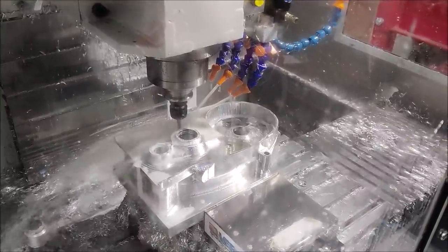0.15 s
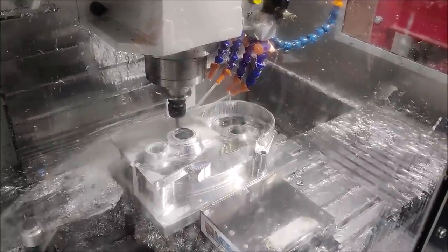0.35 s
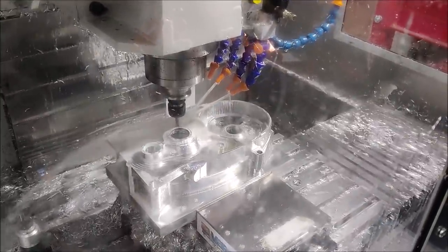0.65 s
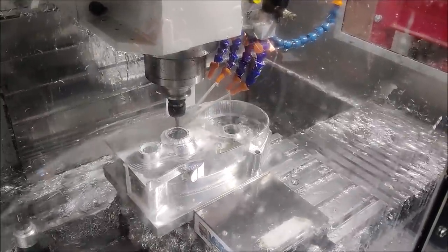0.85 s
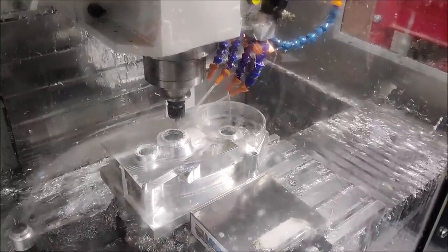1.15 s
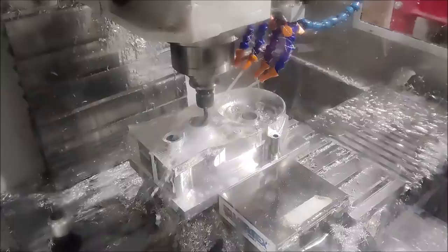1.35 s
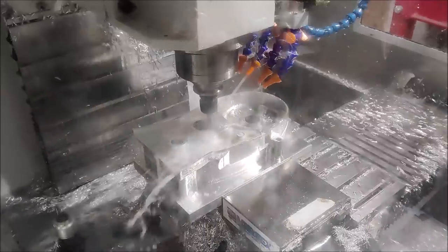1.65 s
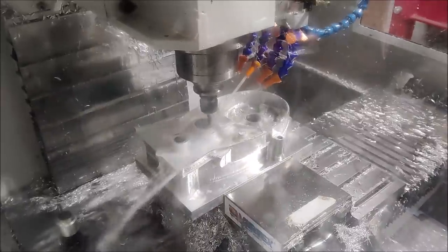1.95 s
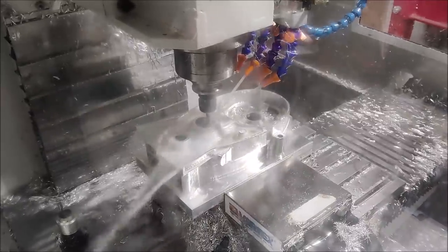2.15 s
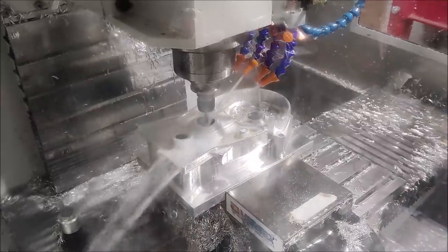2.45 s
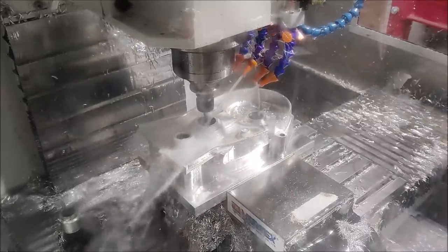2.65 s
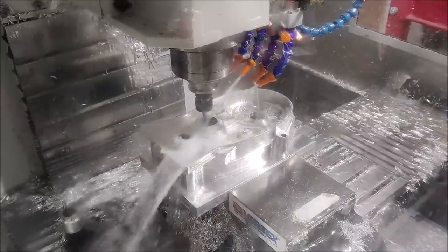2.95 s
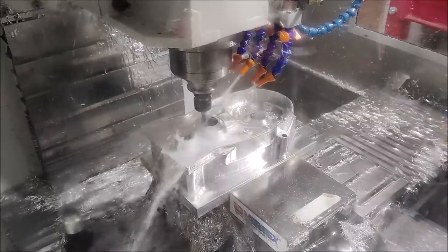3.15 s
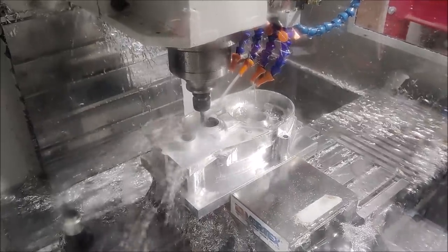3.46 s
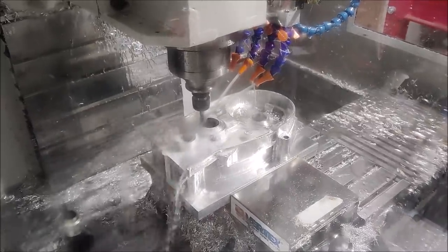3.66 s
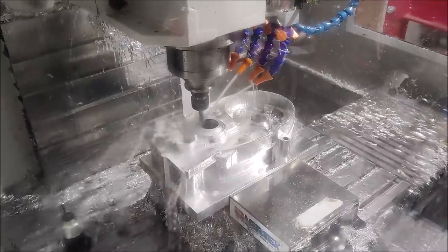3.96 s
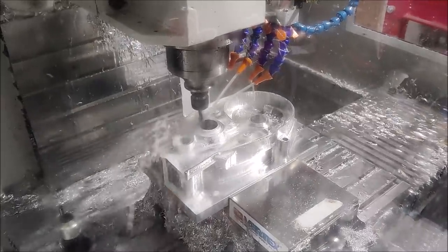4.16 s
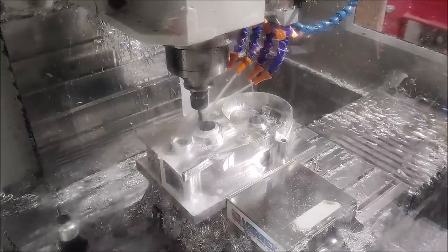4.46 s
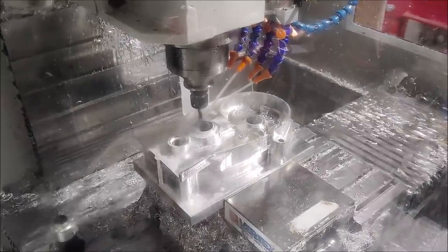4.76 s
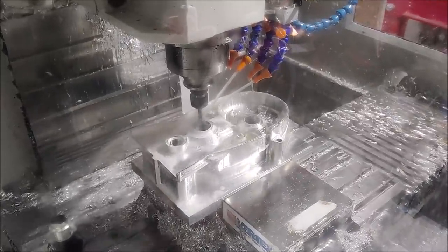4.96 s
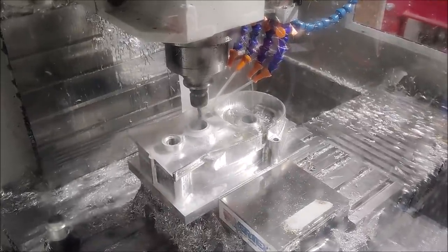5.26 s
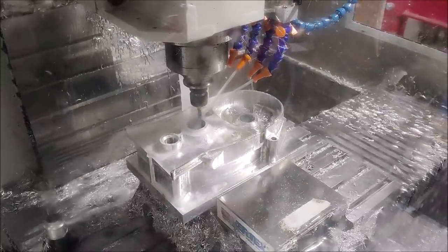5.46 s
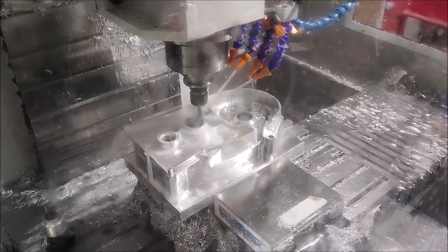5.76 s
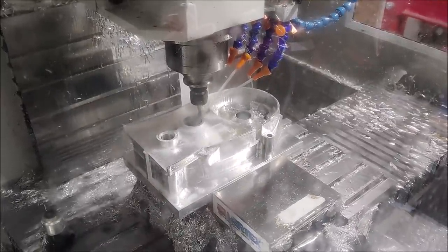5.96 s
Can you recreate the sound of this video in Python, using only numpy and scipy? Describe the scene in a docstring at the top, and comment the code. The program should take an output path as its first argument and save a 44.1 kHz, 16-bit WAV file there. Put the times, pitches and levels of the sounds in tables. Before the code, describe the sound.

A milling cutter whines piercingly and rasps through metal under hissing coolant over a low motor hum, dropping briefly to silence before swelling back.

```python
"""Inside the steel enclosure of a CNC mill, an aluminium part is finished at 6000 rpm under flood coolant.
Filtered noise makes the coolant, wavering sines the motors, frame hum and tool whine near 5 kHz. The cutter
scrapes steadily, swelling slightly each turn in a pattern that repeats every eight turns, and ticks in a two-
turn pattern; short ringing strokes near 5 kHz make the chatter, on a lap of their own. After a second the sound
drops out, then swells back in on a later pass of the cut."""
import sys
import numpy as np
from scipy import signal
from scipy.fft import rfft, irfft
from scipy.io import wavfile
from scipy.ndimage import uniform_filter1d

SR = 44100
rng = np.random.default_rng(int(sys.argv[2]) if len(sys.argv) > 2 else 0)


def wav_record(signal):
    """Record a signal, one row per channel, as 16-bit PCM in the file named by sys.argv[1]."""
    frames = np.transpose(np.atleast_2d(signal))
    bounded = np.clip(frames, -1, 1)
    # unit amplitude maps onto the largest positive 16-bit level
    quanta = np.round(bounded * 32767).astype(np.int16)
    wavfile.write(sys.argv[1], SR, quanta)


N = 269451
TIME = np.arange(N) / SR  # s
FREQ = np.arange(N // 2 + 1) * SR / N  # Hz
SPINDLE_HZ = 100
SECOND_PASS_S = 1.2  # settings change here, inside the silence
PORT_LAG_S = .00047  # longest delay of the right port behind the left
TURNS_PER_CYCLE = 8  # the scrape repeats after this many turns


def undb(db):
    """Decibels to gain."""
    return 10 ** (np.asarray(db) / 20)


def curve(rows):
    """Rows of (time_s, value) joined by straight lines."""
    return np.interp(TIME, *np.transpose(rows))


def spectrum(rows):
    """Rows of (pitch_hz, value) joined on a log-frequency axis."""
    hz, value = np.transpose(rows)
    return np.interp(np.log(FREQ + 1), np.log(hz), value)


def pan(left_minus_right_db):
    """Left and right gains for a level difference, keeping the mean power."""
    gains = undb(np.array([left_minus_right_db, -left_minus_right_db]).reshape(2, -1) / 2)
    return gains / np.sqrt(np.mean(gains ** 2, axis=0))


def walk(rate_hz):
    """Smooth random drift with a spread near 1 that changes about rate_hz times a second."""
    count = int(rate_hz * N / SR) + 3
    coarse = signal.resample(rng.standard_normal(count), count * 8)
    return np.interp(TIME * rate_hz * 8, np.arange(len(coarse)), coarse)


def port_lag(hz):
    """Treble comes straight from the cut and reaches the left port first; bass fills the enclosure evenly."""
    return PORT_LAG_S * np.interp(hz, [600, 1100], [.15, 1])


def tone(phase, first_db, second_db, pan_db, lead_rad):
    """One stereo partial, with its own level on each pass and its own standing wave between the ports."""
    gain = np.where(TIME < SECOND_PASS_S, undb(first_db), undb(second_db))
    port_delay = np.array([[0], [lead_rad]])
    return np.sqrt(2) * gain * pan(pan_db) * np.sin(phase - port_delay)


# colour of the first pass, which cuts elsewhere on the part: pitch_hz [Hz], gain_db [dB]
FIRST_PASS_COLOUR = [(200, -0.5), (600, 1.5), (1500, -1.5), (2000, -2), (2800, 0), (3600, -0.5), (5000, 2),
                     (7000, -0.5), (10000, -2.5)]


def first_pass(x):
    """The cut sits elsewhere on the part before the drop-out, so an equaliser gives it another colour."""
    coloured = irfft(rfft(x) * undb(spectrum(FIRST_PASS_COLOUR)), N)
    return np.where(TIME < SECOND_PASS_S, coloured, x)


# coolant jets and run-off, with a thin sizzle near 10 kHz, before trim: pitch_hz [Hz], density_db [dB per Hz]
COOLANT_COLOUR = [(20, -66), (60, -62), (450, -65), (700, -64.5), (900, -68), (1130, -63), (1400, -69.5),
                  (2600, -63.5), (3200, -64), (4200, -61.5), (4800, -66.5), (5400, -65), (7500, -66.5),
                  (8600, -78.5), (9600, -80.5), (10050, -65), (10600, -100), (11500, -104), (13000, -91)]
# likeness of the coolant noise at the two ports: pitch_hz [Hz], likeness [0-1]
PORT_LIKENESS = [(40, .95), (300, 0.94), (700, 0.1), (1500, 0.3), (5000, 0), (12000, 0.12)]
# stereo balance across pitch, shared with the ticks and scrape: pitch_hz [Hz], left_minus_right_db [dB]
BALANCE = [(100, -3.5), (400, 1), (2500, -1), (4000, -1), (5000, 10.5), (6500, -7), (7400, 6), (8200, 8),
           (10000, 11), (14000, 7)]


def coolant(turns, trim_db=-4.0, splash_db=0.7, spray_db=1.0, drops_db=-9):
    """Jets hiss on the part, drops patter on the guards, and the cutter flings spray once a turn."""
    drop_chance = 900 / SR  # 900 drops a second in each noise
    drops = (rng.random((2, N)) < drop_chance) * rng.standard_normal((2, N))
    noise = rng.standard_normal((2, N)) + undb(drops_db) * drops / drops.std()
    swell_db = splash_db * walk(22.04) + spray_db * np.cos(2 * np.pi * turns)
    shared, own = rfft(noise * undb(swell_db))
    # the right port hears a late copy of the left, mixed with noise of its own
    likeness = np.clip(spectrum(PORT_LIKENESS), 0, 1)
    late = shared * np.exp(-2j * np.pi * FREQ * port_lag(FREQ))
    right = likeness * late + np.sqrt(1 - likeness ** 2) * own
    colour = undb(spectrum(COOLANT_COLOUR) + trim_db) * pan(spectrum(BALANCE)) * np.sqrt(SR / 2)
    return irfft(colour * np.array([shared, right]), N)


# pump and drive motor tones, levels before trim: pitch_hz [Hz], first_pass_db [dB], second_pass_db [dB],
# left_minus_right_db [dB], left_lead_rad [radians], roughness_rad [radians]
MOTOR_TONES = [(379.5, -42.5, -47, 1, -.1, .8), (450, -52, -49, 0, -.1, .6), (522.5, -53, -54, 3, .3, .2),
               (638.5, -51, -52, 7, .4, .2), (734.2, -53, -52, 6, -.6, .3), (736.3, -46, -45, 6, -.6, .35),
               (746.27, -41.5, -40.5, 1, -.4, .06), (750, -51, -46.5, 3, -.5, .06),
               (763.2, -56, -52, 7, 1, .4), (820.9, -54, -52, 7, .3, .1), (836.2, -51, -48.5, 13, -.4, .2)]
THROB_S = 3.48  # the tones line up here, apart from their wander, and the throb peaks


def motors(drift_rad=0.07, waver_db=0.3, trim_db=-1):
    """Pump and drive motors run free of the spindle; close pairs throb, unevenly where they run rough."""
    out = 0
    for hz, *levels, rough_rad in MOTOR_TONES:
        wander = drift_rad * walk(3.4) + rough_rad * walk(28)
        phase = 2 * np.pi * hz * (TIME - THROB_S) + wander
        out = out + undb(trim_db + waver_db * walk(9)) * tone(phase, *levels)
    return out


# frame hum, levels before trim: multiple [of the spindle rate], first_pass_db [dB], second_pass_db [dB],
# left_minus_right_db [dB], left_lead_rad [radians]
FRAME_HUM = [(1, -32.5, -34.3, 2, .4), (2, -49, -49, 3, 0), (4, -49, -49.5, 4, .2), (5, -52, -47, -10, .8),
             (6, -41, -37.5, -1, .5), (8, -44.5, -44.2, 11, .3), (10, -52, -46.5, 11, 2.1),
             (11, -43, -38, 3, -2.7), (12, -51, -47.5, -10, 1.3), (19, -57, -47, 9, -1),
             (20, -51, -46, -2, -1.5), (23, -45, -40.5, 9, 1.4), (25, -45, -46, 8, -1),
             (27, -51, -45, 0, 1), (28, -39, -42, 3, 2.2), (31, -56, -47, 0, -1.7), (34, -51, -46, 4, -.8),
             (38, -44, -44, 4, -.1)]


def hum(turns, waver_db=0.87, drift_rad=0.11, flutter_rad=0.13, trim_db=0.42):
    """Unbalance and cutting force shake the frame at multiples of the spindle rate; higher ones waver more."""
    out = 0
    for multiple, *levels in FRAME_HUM:
        loose = min(multiple / 6, 1.8)  # scales waver, drift and flutter
        wander = loose * (drift_rad * walk(6) + flutter_rad * walk(30))
        phase = 2 * np.pi * (multiple * turns + rng.random()) + wander
        out = out + undb(trim_db + loose * waver_db * walk(7)) * tone(phase, *levels)
    return out


# strokes of the chatter within one lap: centre_ms [ms], level_db [dB, relative]
CHATTER_STROKES = [(5.2, -2), (7.5, 1), (17.8, -1), (21.7, 1), (24.6, 0), (28.6, -4), (33.2, 1), (44.5, -2),
                   (48.3, -1), (51.4, -5), (56.6, 0), (61, 2.5), (75.6, -1), (78.2, -5)]
# loudness of the chatter along the cut: time_s [s], level_db [dB]
CHATTER_LOUDNESS = [(.1, -36), (1.0, -33), (1.8, -31.5), (3.3, -32.5), (5.3, -32.5), (6.1, -30)]
BELT_LAP_MS = 80.4  # one lap of the drive belt, a little longer than eight spindle turns
CHATTER_HZ, CHATTER_SPREAD_HZ, STROKE_MS = 4970, 110, .8
CHATTER_PAN_DB = 8  # left minus right


def chatter(drift_rad=.3, waver_db=0.5, rasp=0.24):
    """Short strokes ring the spindle near 5 kHz, probably from its drive belt, sliding against the turns."""
    out = 0
    for centre_ms, level_db in CHATTER_STROKES:
        age_ms = (TIME * 1000 - centre_ms + BELT_LAP_MS / 2) % BELT_LAP_MS - BELT_LAP_MS / 2
        near = abs(age_ms) < 4
        age = age_ms[near] - np.array([[0], [PORT_LAG_S * 1000]])  # the right port is late
        hz = CHATTER_HZ + CHATTER_SPREAD_HZ * rng.standard_normal()
        # each stroke has its own rasp, the same on every lap
        grit_points = rng.standard_normal(18) + 1j * rng.standard_normal(18)
        grit = np.interp(age, np.linspace(-5, 5, 18), grit_points)
        phase = 2 * np.pi * (hz * age / 1000 + rng.random()) + drift_rad * walk(1.5)[near]
        ring = ((1 + rasp * grit) * np.exp(1j * phase)).imag
        envelope = np.exp(-.5 * (age / STROKE_MS) ** 2)
        stroke = np.zeros((2, N))
        stroke[:, near] = undb(level_db + waver_db * walk(2)[near]) * envelope * ring
        out = out + stroke
    return out / out.std() * undb(curve(CHATTER_LOUDNESS)) * pan(CHATTER_PAN_DB)


# partials that the tool's resonance sustains, some just off the spindle's grid so the beats keep shifting;
# levels before trim and beat evening: pitch_hz [Hz], five of level_db [dB, one per time below],
# left_minus_right_db [dB], left_lead_rad [radians]
WHINE_PARTIALS = [(4450, -48, -47, -46, -45, -44, 12, 1.6), (4500, -45, -43, -43, -39, -41, 6, 2.1),
                  (4600, -41, -44, -40, -35.5, -36, 7, 1.4), (4700, -40, -40, -42, -39.5, -39, 5, 1.2),
                  (4750, -52, -52, -48, -41, -42, 10, 1.2), (4800, -51, -51, -41, -42, -48, 9, 2.1),
                  (4875.4, -38, -37, -46, -42, -41, 8, 2.6), (4887.9, -41, -38, -43, -42, -42, 9, 2.6),
                  (4900, -42, -36, -38, -39, -39, 12, 2.7), (4925.3, -43, -45, -32, -32, -30, 14, 2.5),
                  (4950.1, -29.5, -23.5, -36, -37, -37, 7, 2.5), (4975.3, -46, -46, -46, -39, -40, 12, -.1),
                  (5000, -33, -30, -32, -36, -26.5, 6, 1.9), (5049.95, -43, -39, -31.5, -37, -36, 2, -.2),
                  (5099.9, -39, -33, -31, -31, -30.5, 7, 1.1), (5124.7, -43, -41, -40, -40, -42, 6, 2.3),
                  (5149.7, -29, -38, -36, -38, -38, 5, -3), (5199.5, -38, -39, -41, -38, -37, 4, 3),
                  (5250, -45, -47, -39, -43, -46, 3, 1), (5300, -32, -34, -48, -48, -49, 6, 2.7),
                  (5700, -44, -43, -42, -41, -41, 1, .1), (5750, -46, -46, -42, -41, -41, 9, 1.6),
                  (5850, -54, -54, -45, -45, -45, 10, .7)]
# moments along the tool path for those five levels: time_s [s]
WHINE_TIMES = [.1, .95, 2.1, 4.4, 5.2]


def whine(turns, drift_rad=0.27, waver_db=2.0, trim_db=-0.24):
    """The tool rings in close partials whose balance shifts; rubbing on the wall evens out their beats."""
    ring = 0
    for hz, *levels, pan_db, lead_rad in WHINE_PARTIALS:
        gain = undb(np.interp(TIME, WHINE_TIMES, levels) + waver_db * walk(5))
        phase = 2 * np.pi * (hz / SPINDLE_HZ * turns + rng.random()) + drift_rad * walk(1.5)
        ports = pan(pan_db) * np.exp(-1j * np.array([[0], [lead_rad]]))
        ring = ring + ports * (gain * np.exp(1j * phase))
    # gently compress the beats against a running average, keeping the overall power
    power = np.mean(abs(ring) ** 2, axis=0) + abs(ring.mean(axis=0)) ** 2
    evening = (power / uniform_filter1d(power, SR // 6) + .3) ** -.12
    makeup = 1 / np.sqrt(np.mean(power * evening ** 2) / power.mean())
    return np.sqrt(2) * undb(trim_db) * ring.imag * evening * makeup


# bites of the cutting edges within two spindle turns: start_ms [ms], level_db [dB, relative]
EDGE_BITES = [(2, -1), (6.6, -4), (12.1, 0), (14.35, 1), (17.6, -4)]
# colour of one tick: pitch_hz [Hz], gain_db [dB, relative]
TICK_SPECTRUM = [(100, -38.5), (300, -23), (800, -6.5), (1400, -1), (2400, -1.5), (4000, 0.5), (5800, 3),
                 (7500, -13.5), (9000, -28.5), (12000, -54.5)]


def ticks(turns, level_db=-33, scatter_db=1.2, ring_s=0.00017, fresh=.2, jitter_s=.00001):
    """Each edge snaps into the metal with a dying noise burst; the two-turn pattern merges into a rasp."""
    cycles = np.arange(0, turns[-1], 2)
    snaps = np.zeros(N)
    age = np.arange(128) / SR
    for start_ms, bite_db in EDGE_BITES:
        own = rng.standard_normal(len(age))  # the part that returns on every cycle
        chance = rng.standard_normal((len(cycles), len(age) + 2))  # columns: level, timing, fresh noise
        cracks = (own + fresh * chance[:, 2:]) * np.exp(-age / ring_s)
        cracks /= np.linalg.norm(cracks, axis=1, keepdims=True)
        cracks *= undb(bite_db + scatter_db * chance[:, :1])
        starts = np.interp(cycles, turns, TIME) + start_ms / 1000 + jitter_s * chance[:, 1]
        first_sample = np.round(starts * SR).astype(int)[:, None]
        np.add.at(snaps, (first_sample + np.arange(len(age))) % N, cracks)
    lag = 2 * np.pi * FREQ * port_lag(FREQ)
    ports = pan(spectrum(BALANCE)) * np.exp(-1j * lag * np.array([[0], [1]]))
    out = irfft(rfft(snaps) * undb(spectrum(TICK_SPECTRUM)) * ports, N)
    return undb(level_db) * out / out.std()


def strikes(size, contact_turns=0.84, rub_db=3, force_db=-0.5):
    """Cutting force over one eight-turn cycle: a broad smooth swell each turn over a steady rub."""
    angle = np.arange(size) * TURNS_PER_CYCLE / size % 1 - .5  # turns from the middle of the bite
    force = undb(force_db * rng.standard_normal(TURNS_PER_CYCLE))
    force = np.repeat(force, size // TURNS_PER_CYCLE)
    return force * np.exp(-.5 * (angle / contact_turns) ** 2) + undb(rub_db)


# resonances of tool, part and vice, as levels of a once-a-turn harmonic before trim:
# pitch_hz [Hz], width_hz [Hz], level_db [dB]
BODY_RESONANCES = [(920, 910, -61), (2680, 590, -48), (3500, 490, -50), (4950, 300, -47), (5640, 160, -48),
                   (5995, 140, -49), (7464, 140, -52.5), (10000, 75, -47)]
# uneven chips: the tool's resonance favours the in-between partials: pitch_hz [Hz], gain_db [dB]
UNEVEN_CHIPS = [(100, -14), (700, 2.5), (2500, -4), (4200, 4.5), (5000, 4), (5700, 7.5), (10000, -5)]


def partial_levels(hz, is_first_pass, half_db=-4, quarter_db=-10.0, eighth_db=-12, side_db=4.5):
    """Level and side of each scrape partial: body resonances, with offsets between whole multiples."""
    step = np.arange(len(hz))  # eighths of the spindle rate
    body = 0
    for centre_hz, width_hz, level_db in BODY_RESONANCES:
        body = body + undb(level_db) ** 2 / (1 + 2 * ((hz - centre_hz) / width_hz) ** 2) ** 2
    between = np.select([step % 2 == 1, step % 4 == 2], [eighth_db, quarter_db], half_db)
    between = between + np.interp(hz, FREQ, spectrum(UNEVEN_CHIPS))
    db = 10 * np.log10(body) + (step % 8 > 0) * between
    if is_first_pass:
        db += np.interp(hz, FREQ, spectrum(FIRST_PASS_COLOUR))
    # hum, motors and whine sound at or near these multiples on their own, so the scrape leaves them out
    taken = [0] + [row[0] for row in FRAME_HUM]
    taken += [row[0] / SPINDLE_HZ for row in WHINE_PARTIALS + MOTOR_TONES]
    db[[round(multiple * 8) for multiple in taken]] = -140
    return db, side_db + np.interp(hz, FREQ, spectrum(BALANCE))


def cutter(turns, memory=0.99, patchy=0.82, walls_rad=1.0, trim_db=2.66):
    """The flute scrapes steadily, swelling slightly each turn in a pattern that repeats each cycle, changing as
    the table travels."""
    size = TURNS_PER_CYCLE * SR // SPINDLE_HZ  # samples in one cycle
    fine = 8 * size  # oversampled for smooth reading
    hz = np.arange(size // 2 + 1) * SR / size
    place = turns / TURNS_PER_CYCLE % 1 * size
    hop_s = SECOND_PASS_S / 6  # from one station along the tool path to the next
    out = np.zeros((2, N))
    for is_first_pass, stations in [(True, range(7)), (False, range(7, 32))]:
        db, side = partial_levels(hz, is_first_pass)
        burst = strikes(size)
        # the steel walls turn each partial a little differently at the right port
        wall_turn = walls_rad * np.minimum(hz / 1500, 1) * rng.standard_normal(len(hz))
        lag = 2 * np.pi * hz * port_lag(hz) + wall_turn
        ports = undb(db + trim_db) * pan(side) * np.exp(-1j * lag * np.array([[0], [1]]))
        scrape = rng.standard_normal(size)
        for station in stations:
            scrape = memory * scrape + np.sqrt(1 - memory ** 2) * rng.standard_normal(size)
            grain = rfft(scrape * burst)
            grain /= np.sqrt(np.mean(abs(grain) ** 2))
            grain = grain * abs(grain) ** (patchy - 1)  # slightly even out the partials
            cycle = irfft(ports * grain, fine) * fine / np.sqrt(2)
            # each place along the tool path blends into the next
            distance = abs(TIME / hop_s - station)
            near = distance < 1
            for port in range(2):
                heard = np.interp(place[near], np.arange(fine) / 8, cycle[port], period=size)
                out[port, near] += (1 - distance[near]) * heard
    return out


# ridges and hollows of the steel enclosure: pitch_hz [Hz], gain_db [dB]
ENCLOSURE_COLOUR = [(1700, 1), (2000, 1.5), (2450, 1), (2720, 1), (3050, -1.5), (3260, -3.5), (3400, -2),
                    (3560, 0.5), (3680, -6.5), (3850, 1), (4020, -2), (4400, 0), (5280, 7.5), (5500, 1.5),
                    (5900, 0), (6100, 1), (6250, -2), (6380, 1), (6950, -2.5), (7380, 2), (7560, 0),
                    (7750, 2), (8100, -5)]


def enclosure(x):
    """Reflections from the steel walls leave ridges and hollows in the treble."""
    return irfft(rfft(x) * undb(spectrum(ENCLOSURE_COLOUR)), N)


# how hard the cutter bites on the first pass, relative to the mean load: time_s [s], load_db [dB]
FIRST_PASS_LOAD = [(0.03, -27), (1.0, -26), (1.02, -23)]
# and on the second pass: time_s [s], load_db [dB]
SECOND_PASS_LOAD = [(1.68, -24.5), (3.08, -26), (4.74, -27.5), (5.25, -27), (5.72, -28.5), (6.1, -26.5)]


def scene():
    """One spindle angle drives cut, whine, hum and spray; chatter and motors keep their own time."""
    turns = SPINDLE_HZ * TIME + 0.00063 * walk(3.9)
    load_db = curve(np.vstack([FIRST_PASS_LOAD, SECOND_PASS_LOAD]))
    cut = undb(load_db - load_db.mean()) * (cutter(turns) + first_pass(ticks(turns)))
    walled = enclosure(first_pass(coolant(turns)) + cut)
    return walled + motors() + hum(turns) + chatter() + whine(turns)


DROP_S, DROP_DB_PER_S = 1.028, 1644  # the sound drops out
RETURN_S, RETURN_LENGTH_S, RETURN_POWER = 1.391, 0.32, 1.04  # and swells back in


def fade():
    """A fall at a steady rate in dB, silence, then a slightly bowed rise to full level."""
    fall = undb(-DROP_DB_PER_S * np.clip(TIME - DROP_S, 0, .1))
    rise = np.clip((TIME - RETURN_S) / RETURN_LENGTH_S, 0, 1) ** RETURN_POWER
    return np.maximum(fall, rise)


def record(dry):
    """The brief drop-out, then a steep low-pass at 15.2 kHz cuts the top."""
    low_pass = signal.ellip(8, .2, 80, 15200, fs=SR, output="sos")
    return signal.sosfilt(low_pass, dry * fade())


dry = scene()
out = record(dry)
wav_record(out)
```